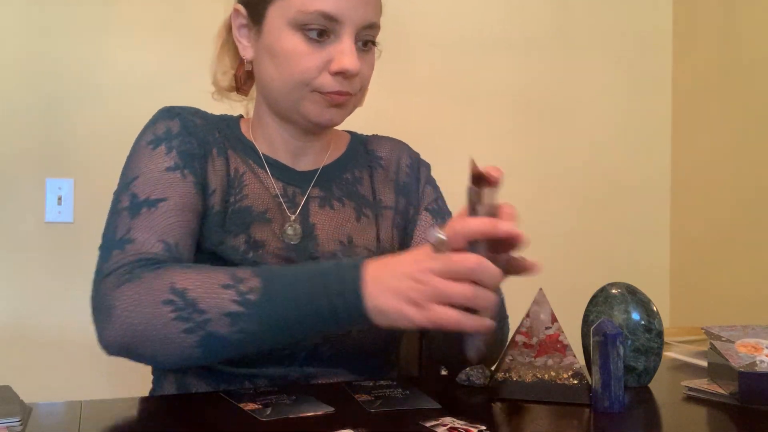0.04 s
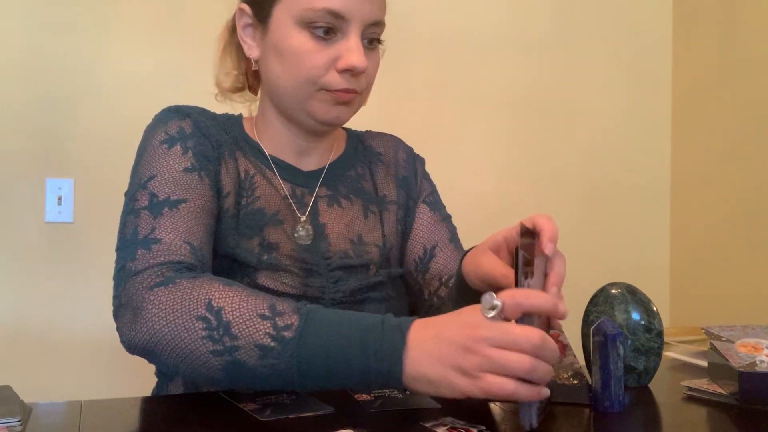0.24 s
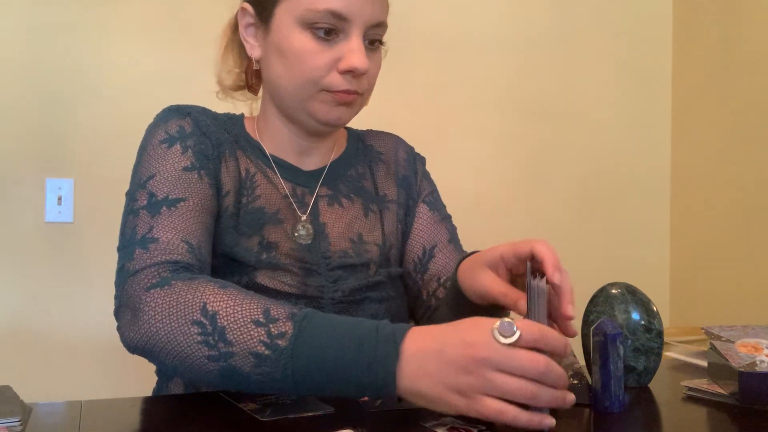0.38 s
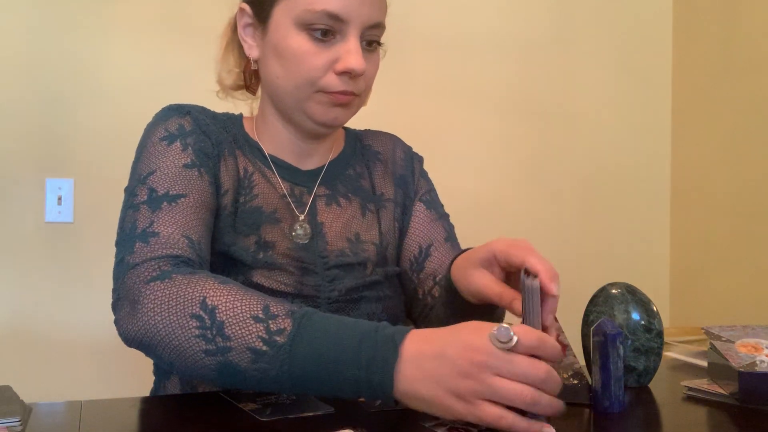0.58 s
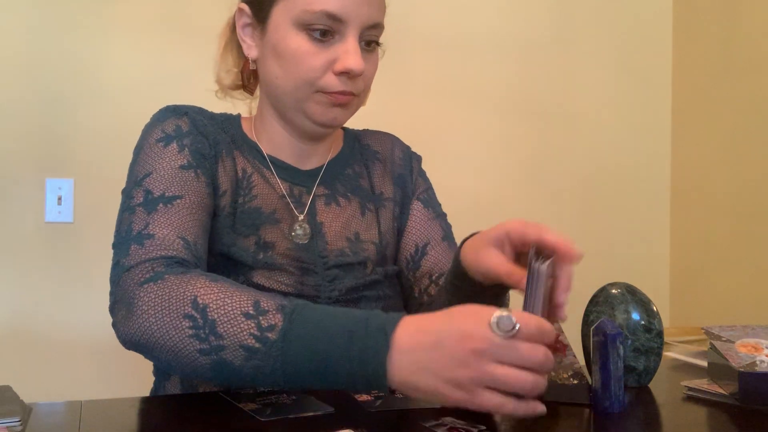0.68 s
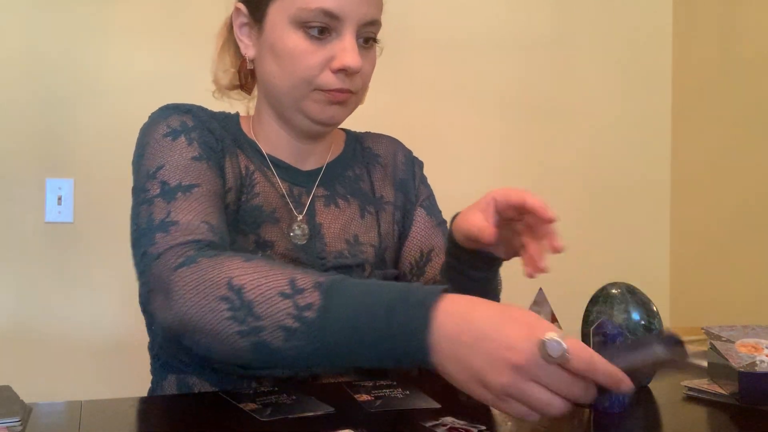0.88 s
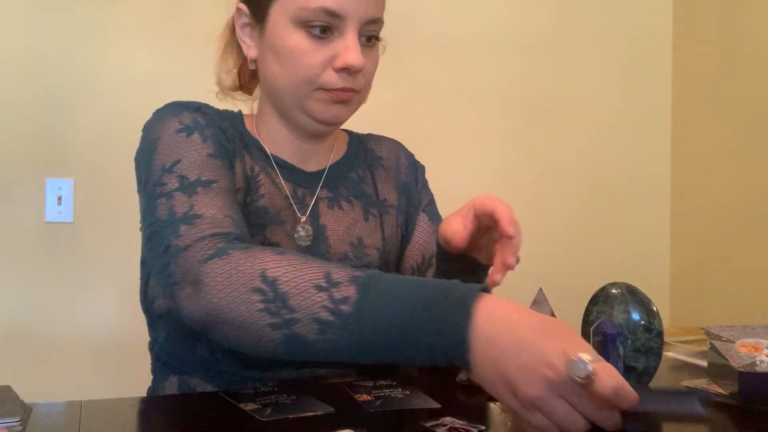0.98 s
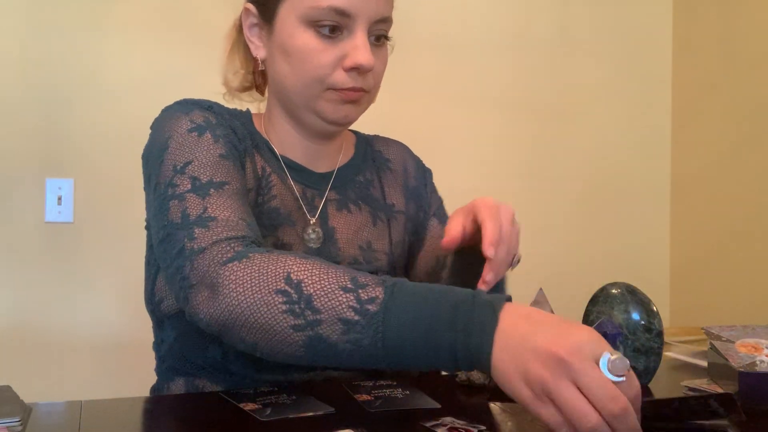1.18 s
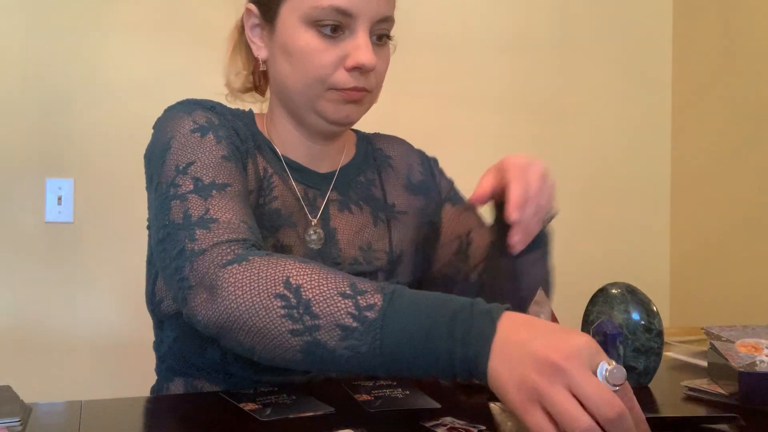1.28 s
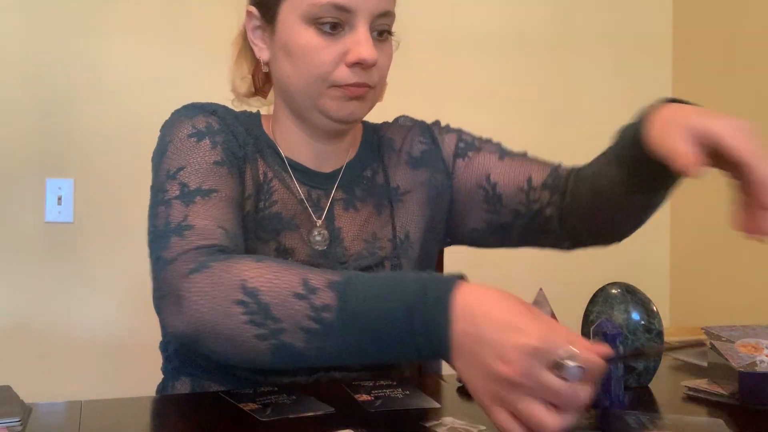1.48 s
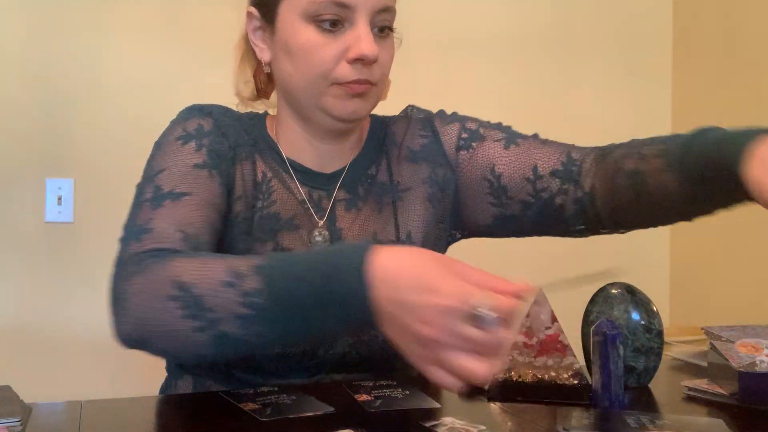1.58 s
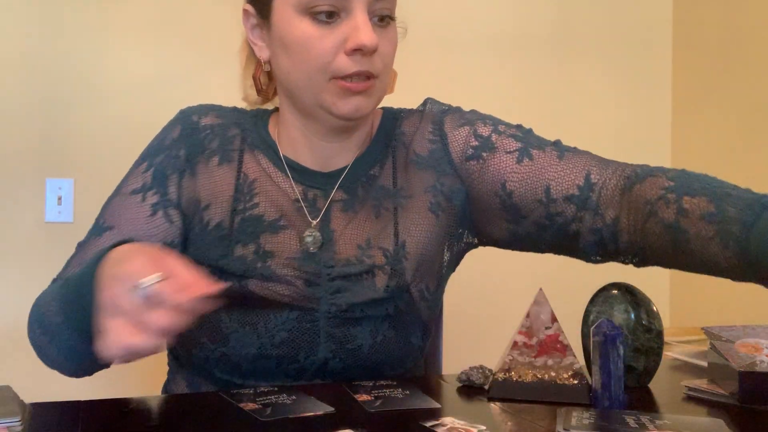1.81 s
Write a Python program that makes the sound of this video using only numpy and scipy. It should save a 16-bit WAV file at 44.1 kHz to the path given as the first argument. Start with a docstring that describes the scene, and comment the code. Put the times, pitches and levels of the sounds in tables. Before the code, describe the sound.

Playing cards are handled on a wooden table: faint rustling first, then a loud sharp knock of the deck's edge at 0.24 seconds, with uneven clacks and loose card rattle until about 0.5. A small tick follows near 0.57 and a light slide at 0.8. A crisp snap comes at 1.08, a soft low thump at 1.22, a faint flick at 1.53, and tiny ticks near 1.8. Quiet, lightly echoing room, low hum, close stereo microphone.

```python
"""Squaring and laying down a deck of cards

A hand knocks the edge of a stiff deck on a wooden table: paired impulses excite the deck's damped modes.
Cards then slide (modulated friction noise), snap (clicks with short rasps) and land with a soft thump
(low table modes), close to a small two-port microphone on their left. A quiet room hums, hisses and
answers with decaying noise echoes."""
import sys
import numpy as np
from scipy import signal
from scipy.fft import rfft, irfft, next_fast_len
from scipy.io import wavfile
from scipy.ndimage import map_coordinates

SR = 44100
rng = np.random.default_rng(int(sys.argv[2]) if len(sys.argv) > 2 else 0)


def magnitude_from_level(level_db):
    """Linear magnitude for a level in decibels (20 dB per decade)."""
    exponent = np.asarray(level_db, float) / 20
    return 10 ** exponent


def dump(signal):
    """Clip the signal to [-1, 1] and save it as 16-bit WAV at the path in sys.argv[1]."""
    limited = np.clip(np.atleast_2d(signal).T, -1, 1)
    pcm = np.round(limited * 32767).astype(np.int16)
    wavfile.write(sys.argv[1], SR, pcm)


N = 81585  # samples

# Deck edge meeting the table: start_s, level_db (peak before KNOCK_GAIN_DB), pitch_hz, far_over_near_corner_db
KNOCKS = [(.189, -47.5, 1360, -10.5), (0.224, -47, 1600, -13.5), (0.235, -8, 1504, 8),
          (0.243, -27.5, 1250, -7.5), (.253, -28, 1200, -3), (0.261, -27.5, 1470, -4.5),
          (.284, -28.5, 1610, -6.5), (0.3007, -23, 1154, -10), (.337, -22, 1290, -18),
          (0.357, -38.5, 1530, -6), (.406, -18.5, 1256, -3), (.427, -21, 1303, -5.5),
          (.456, -12, 1324, -10.5), (0.49, -26.5, 1290, -11.5), (.577, -36.5, 1310, -2.5),
          (1.005, -51, 1290, -19.5), (1.052, -66, 1380, -6.5), (1.151, -50.5, 1300, 1)]
# Modes of the deck at its reference pitch: frequency_hz, width_hz, level_db (before scatter)
DECK_MODES = [(324, 49, -25.5), (690, 170, -14), (1014, 120, -12), (1290, 126, 4), (1546, 353, -4.5),
              (2000, 200, -9), (2126, 220, -5), (2582, 100, -3.5), (2810, 69, -10), (3410, 120, -13)]
DECK_PITCH_HZ, PITCH_FOLLOW_EXPONENT, MODE_SCATTER_DB = 1300, 0.65, 2.5
FAR_CORNER_DELAY_S, CONTACT_CORNER_HZ, KNOCK_GAIN_DB = 0.001801, 3414, 2
# Loose cards rattling in the deck: time_s, level_db (before CHATTER_GAIN_DB)
CHATTER = [(0.2, -74), (0.25, -34), (.268, -45), (0.282, -54.5), (0.366, -49.5), (0.41, -47),
           (0.454, -56.5), (0.475, -44), (0.53, -49), (0.558, -61), (0.72, -61)]
CHATTER_RATE_PER_S, CHATTER_GAIN_DB = 280, -4.5
# Deck heard from all sides, as the room receives it: frequency_hz, relative_level_db
DECK_AROUND = [(200, -30), (400, -10.5), (800, -12.5), (1300, 0), (1900, -3), (2600, -8), (3500, -15),
               (4300, -37), (7000, -51.5)]
AROUND_GAIN_DB, AROUND_T60_S = -5, 0.023

# Card edge snapping free or landing: start_s, treble_click_peak_db, body_click_peak_db, body_hz,
# body_width_over_pitch (ratio), rasp_length_s (time to fall 30 dB)
SNAPS = [(0.064, -48.5, -61, 2045, 1.4, 0.0058), (0.11, -43.5, -45, 2426, 2.7, .008),
         (0.2, -44.5, -60, 2010, 1.7, 0.0045), (0.237, -42, -42.5, 5470, 0.48, .004),
         (.269, -49.5, -60, 3600, 1, 0.0072), (0.455, -44.5, -39.5, 5750, .6, 0.011),
         (0.57, -32.5, -36.5, 1350, .8, 0.0043), (0.578, -30.5, -40.5, 650, 1.3, 0.0053),
         (0.801, -41.5, -41, 3250, 0.16, 0.029), (0.796, -58, -47.5, 1490, 1.7, 0.034),
         (1.006, -49, -51, 1800, 0.61, 0.0023), (1.083, -17.5, -30.5, 1200, 1.31, 0.0032),
         (1.0835, -31.5, -23, 4030, 0.25, 0.0036), (1.122, -30.5, -40, 2900, 1.4, 0.0034),
         (1.222, -44.5, -21.5, 1127, 0.98, 0.0048), (1.225, -36, -30.5, 3805, 0.48, 0.007),
         (1.529, -32, -34.5, 2555, 0.95, 0.007), (1.5303, -49, -33.5, 883, 2.17, 0.01),
         (1.5312, -47, -46.5, 4400, 0.7, 0.0094), (1.7875, -48.5, -65.5, 2980, 0.96, 0.0033),
         (1.814, -38.5, -70.5, 2950, 1.2, 0.002), (1.834, -37, -44.5, 2470, 1.33, .008)]
# Spectrum of the edge click and rasp: frequency_hz, relative_level_db
SNAP_TREBLE = [(4000, -38), (6500, -9.5), (9000, -3.5), (13000, -7.5), (16000, -7), (17000, -36)]
TREBLE_RASP_DB, BODY_RASP_DB = -5.5, -6  # rasp relative to its click
SNAP_TO_ROOM_DB = -2

# Pushes on the table top: start_s, level_db (before the two gains below), rise_s, t60_s
THUMPS = [(0.239, -38, 0.0081, 0.59), (0.291, -44, .01, 0.26), (0.34, -47, 0.012, 0.51),
          (0.41, -47.5, .01, 0.5), (0.463, -47.5, .01, 0.36), (0.568, -52.5, 0.0099, 0.45),
          (1.093, -38.5, 0.0067, 0.27), (1.224, -23.5, 0.004, 0.19), (1.53, -42, 0.0042, 0.16)]
# Modes of the table top: frequency_hz, width_hz, level_db
TABLE_MODES = [(98.8, 26, -4), (162.8, 16, 0.5), (244, 26, -2.5), (372, 19, -9.5), (456.6, 23, -17)]
RUMBLE_GAIN_DB, STRUCK_GAIN_DB = -3, 2.5

# Rubbing strokes of cards and fingers: start_s, length_s, treble_db, mids_over_treble_db, fade_t60_s
STROKES = [(0.0, 0.11, -74, -3.5, .1), (0.095, .12, -64.5, -3.5, .15), (0.229, 0.29, -67, 2, 0.084),
           (0.563, .02, -63.5, 8.5, 0.302), (0.724, 0.05, -77, 8, 0.18), (0.787, 0.03, -58, -4, 0.11),
           (1.073, 0.16, -61, -1.5, 0.12), (1.208, 0.033, -63, 0, 0.059), (1.261, 0.023, -60.5, -7, 0.048),
           (1.444, 0.115, -78.5, -10, 0.1), (1.526, 0.017, -63.5, 4, 0.2), (1.822, 0.035, -67.5, 3, .1)]
# Upper friction spectrum: frequency_hz, relative_level_db
SLIDE_TREBLE = [(5000, -41.5), (7000, -9), (9000, -6), (12000, -8), (14500, -6.5), (15800, -7),
                (16300, -41)]
# Middle friction spectrum: frequency_hz, relative_level_db
SLIDE_MIDS = [(500, -39), (1300, -3), (2200, 0), (3300, 1), (4200, -5), (6000, -3), (8000, -14)]
STROKE_RISE_S = 0.0029

# Decay of the room's answer: frequency_hz, t60_s
WALL_DECAY = [(100, 0.38), (1000, 0.48), (4000, 0.27), (12000, 0.098)]
# Colour of the room's answer: frequency_hz, level_db
WALL_COLOUR = [(200, -12), (1500, -8), (3500, -11), (5000, -9), (13000, -20)]
WALL_DELAY_S, WALL_PIECE_S = 0.006, 0.045

# Spectrum of the room's hum: frequency_hz, relative_density_db_per_hz
ROOM_TONE = [(15, -46), (30, -17), (45, -3), (90, -2.5), (152, -2), (216, -14.5), (290, -14), (430, -18.5),
             (605, -27), (2000, -32), (4000, -43), (8000, -51.5), (10000, -100)]
# Spectrum of the microphone hiss: frequency_hz, relative_level_db
HISS = [(3000, -10), (8000, -11.5), (13000, 8.5), (15800, -10), (16300, -43.5)]
ROOM_TONE_DB, HISS_DB = -51, -84
# Likeness of left and right in the room's field: frequency_hz, correlation (ratio)
LIKENESS = [(25, 1), (60, 1), (250, 0.82), (1000, 0.054), (6000, 0.089), (9000, 0.99), (14000, 0.62)]

# Phase between the ports: frequency_hz, left_lag_cycles
PORT_LAG = [(0, 0), (1300, 0.16), (1900, 0.2), (3800, 0.34), (4800, -0.25), (6000, -0.25), (7500, -0.38),
            (9000, -.5), (10200, -0.593), (12500, -.97), (22050, -0.91)]
# Level between the ports at full share: frequency_hz, left_minus_right_db
PORT_LEVEL = [(60, -7.5), (250, -2), (700, -15), (1500, -12.5), (3000, -3), (6000, -1), (12000, 0)]


def unit(x):
    """Normalization: scales a signal to an rms of 1."""
    return x / np.sqrt(np.mean(x ** 2) + 1e-20)


def along(points, hz):
    """Interpolation of (frequency, value) points on a logarithmic frequency axis."""
    f, v = np.transpose(points)
    return np.interp(np.log(hz + 1), np.log(f + 1), v)


def wobble(rate):
    """Random modulation: a smooth curve through `rate` normal knots a second."""
    knots = rng.standard_normal(int(N * rate / SR) + 4)
    return map_coordinates(knots, [np.arange(N) * rate / SR])


def filtered(x, response):
    """Linear filtering: multiplies the spectrum by a complex response of frequency."""
    n = x.shape[-1]
    m = next_fast_len(n + 8192)
    return irfft(rfft(x, m) * response(np.fft.rfftfreq(m, 1 / SR)), m)[..., :n]


def resonant(modes, f):
    """Modal superposition: sums causal damped resonances of alternating sign."""
    total = 0
    for k, (centre, width, db) in enumerate(modes):
        damping = 1j * f * width
        total = total + (-1) ** k * magnitude_from_level(db) * damping / (centre * centre - f * f + damping + 1e-9)
    return total


def noise(spectrum, size=N):
    """Spectral shaping: white noise filtered to a colour, with an rms of 1."""
    return unit(filtered(rng.standard_normal(size), lambda hz: magnitude_from_level(along(spectrum, hz))))


def add(track, s, sound):
    """Superposition: mixes a sound into a track at a time in seconds."""
    part = track[round(s * SR):][:len(sound)]
    part += sound[:len(part)]


def deck_knocks():
    """Impact excitation: two soft contacts ring the deck's modes. Returns (near, as the room gets it)."""
    near, around = np.zeros(N), np.zeros(N)

    def soft_contact(f):
        ratio = f / CONTACT_CORNER_HZ
        return 1 / (1 + 1.2j * ratio - ratio ** 2) ** 3

    scatters = rng.standard_normal((len(KNOCKS), len(DECK_MODES)))
    for (s, db, hz, far_db), scatter in zip(KNOCKS, scatters):
        blow = np.zeros(2048)
        blow[[0, round(FAR_CORNER_DELAY_S * SR)]] = 1, magnitude_from_level(far_db)
        shift = (hz / DECK_PITCH_HZ) ** PITCH_FOLLOW_EXPONENT
        modes = [(c * shift, w, g + MODE_SCATTER_DB * r) for (c, w, g), r in zip(DECK_MODES, scatter)]
        knock = filtered(blow, lambda f: resonant(modes, f) * soft_contact(f))
        add(near, s, magnitude_from_level(db + KNOCK_GAIN_DB) * knock / abs(knock).max())
        decay = magnitude_from_level(-60 * np.arange(len(blow)) / SR / AROUND_T60_S)
        add(around, s, magnitude_from_level(db + AROUND_GAIN_DB) * noise(DECK_AROUND, size=len(blow)) * decay)
    return near, around


def chatter():
    """Random impacts: sparse grains of uneven strength, coloured by the deck, rattle as loose cards."""
    t = np.arange(N) / SR
    hits = rng.random(N) < CHATTER_RATE_PER_S / SR
    grains = hits * rng.standard_normal(N) * magnitude_from_level(0.88 * wobble(36))
    times, levels = np.transpose(CHATTER)
    level = magnitude_from_level(np.interp(t, times, levels) + CHATTER_GAIN_DB)
    active = (t > KNOCKS[2][0]) * (t < CHATTER[-1][0])  # from the third knock to the last level point
    return level * active * unit(filtered(grains, lambda f: magnitude_from_level(along(DECK_AROUND, f))))


def snaps():
    """Impulsive release: an edge click and the short rasp behind it both flex the card's body."""
    out, t = np.zeros(N), np.arange(2048) / SR
    lead = 32  # samples ahead of the click, for the symmetric treble filter
    click = (np.arange(len(t)) == lead) * 1.
    tick = filtered(click, lambda hz: magnitude_from_level(along(SNAP_TREBLE, hz)))
    for s, treble_db, body_db, hz, width, length in SNAPS:
        fade = magnitude_from_level(-30 * t / length) * (1 - np.exp(-t / 0.00037))
        flex = lambda x: filtered(x, lambda f: resonant([(hz, width * hz, 0)], f) ** 2)
        body_click = flex(click)
        body_rasp = fade * unit(flex(rng.standard_normal(len(t))))
        body = body_click / abs(body_click).max() + magnitude_from_level(BODY_RASP_DB) * body_rasp
        treble_rasp = fade * noise(SNAP_TREBLE, size=len(t))
        treble = tick / tick.max() + magnitude_from_level(TREBLE_RASP_DB) * treble_rasp
        add(out, s - lead / SR, magnitude_from_level(treble_db) * treble + magnitude_from_level(body_db) * body)
    return out


def table_thumps():
    """Forced and free vibration: a push strikes the table top's low modes and keeps them rumbling."""
    t = np.arange(N) / SR
    push = np.zeros(N)
    for s, db, rise, t60 in THUMPS:
        since = (t - s).clip(0)
        push += magnitude_from_level(db - 60 * since / t60) * (1 - np.exp(-since / rise))
    rumble = unit(filtered(rng.standard_normal(N), lambda f: resonant(TABLE_MODES, f)))
    out = magnitude_from_level(RUMBLE_GAIN_DB) * push * rumble
    ring = filtered((t[:SR // 4] == 0) * 1., lambda f: resonant(TABLE_MODES, f))
    for s, db, rise, t60 in THUMPS:
        add(out, s + rise, magnitude_from_level(db + STRUCK_GAIN_DB) * ring / abs(ring).max())
    return out


def slide():
    """Dry friction: grainy noise in strokes that rise, hold and fade."""
    t = np.arange(N) / SR
    treble, mids = np.zeros(N), np.zeros(N)
    for s, length, db, mids_db, t60 in STROKES:
        rise = ((t - s) / STROKE_RISE_S).clip(0, 1)
        stroke = rise * magnitude_from_level(-60 * (t - s - length).clip(0) / t60)
        treble += magnitude_from_level(db) * stroke
        mids += magnitude_from_level(db + mids_db) * stroke
    grain = magnitude_from_level(3.2 * wobble(27) + 2.79 * wobble(360))  # slow and fine unevenness
    return grain * (treble * noise(SLIDE_TREBLE) + mids * noise(SLIDE_MIDS))


def walls(x):
    """Reverberation: each frequency decays at its own speed; moving hands meet ever different echoes."""
    step, out = round(WALL_PIECE_S * SR), np.zeros((N + SR, 2))
    for start in range(0, N, step):
        piece = x[start:start + step]
        hz, t, z = signal.stft(rng.standard_normal((2, SR // 3)), SR, nperseg=256)
        decay = magnitude_from_level(-60 * t / along(WALL_DECAY, hz)[:, None])
        tail = signal.istft(z * decay, SR, nperseg=256)[1]
        echo = signal.fftconvolve(piece[None], tail / np.linalg.norm(tail[0]), axes=1)
        add(out, start / SR + WALL_DELAY_S, echo.T)
    return diffuse(filtered(out[:N].T, lambda hz: magnitude_from_level(along(WALL_COLOUR, hz))))


def room_tone():
    """Stationary background: a low rumble of wavering level and a faint steady microphone hiss."""
    pair = lambda spectrum: np.array([noise(spectrum), noise(spectrum)])
    rumble = magnitude_from_level(ROOM_TONE_DB + 0.96 * wobble(11.94)) * pair(ROOM_TONE)
    return diffuse(rumble + magnitude_from_level(HISS_DB) * pair(HISS))


def diffuse(pair):
    """Diffuse-field coherence: mixes two unrelated signals to the room's left-right likeness."""
    turn = lambda hz: np.arccos(np.clip(along(LIKENESS, hz), -1, 1)) / 2
    mid, side = filtered(pair, lambda hz: np.array([np.cos(turn(hz)), np.sin(turn(hz))]))
    return np.array([mid + side, mid - side])


def ports(x, share=1):
    """Interaural-like differences: phase and level set left against right; share scales the level part."""
    side = np.array([[1], [-1]])  # left, right

    def response(f):
        level = magnitude_from_level(side * share * along(PORT_LEVEL, f) / 2)
        lag_cycles = np.interp(f, *np.transpose(PORT_LAG))
        return level * np.exp(-1j * np.pi * side * lag_cycles)

    return filtered(x, response)


def scene():
    """Direct and reverberant fields: cards and table, their echo and the room, through the two ports."""
    near, around = deck_knocks()
    rattle, edges = chatter(), snaps()
    rest = table_thumps() + slide()
    direct = near + rattle + edges + rest
    echo = walls(around + rattle + magnitude_from_level(SNAP_TO_ROOM_DB) * edges + rest)
    return ports(direct[None]) + ports(echo + room_tone(), share=0.11)


def roll_off(x):
    """The treble ends steeply here."""
    return signal.sosfilt(signal.butter(12, 17080, fs=SR, output="sos"), x)


def record(dry):
    """Recording chain: passes the finished mix to its last stage."""
    return roll_off(dry)


dry = scene()
out = record(dry)
dump(out)
```